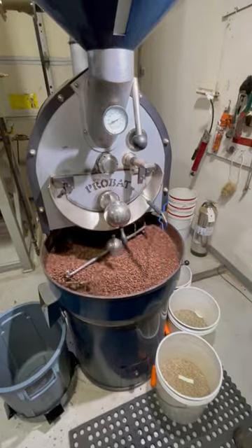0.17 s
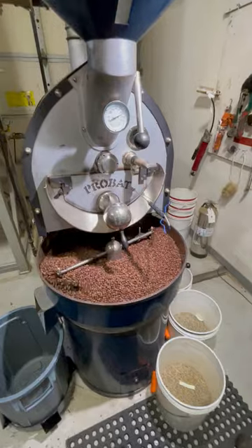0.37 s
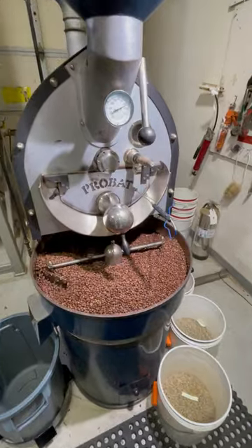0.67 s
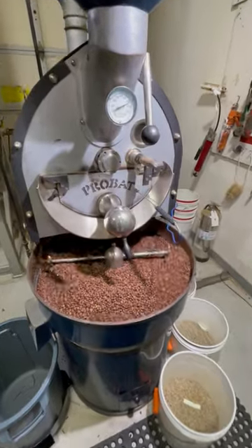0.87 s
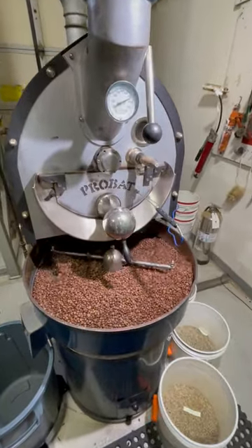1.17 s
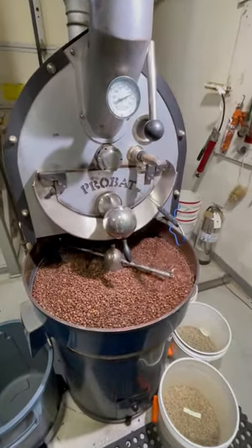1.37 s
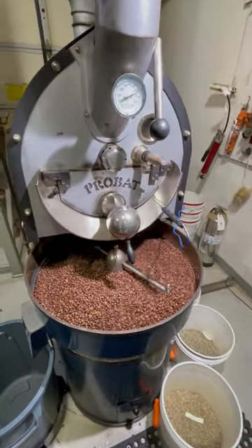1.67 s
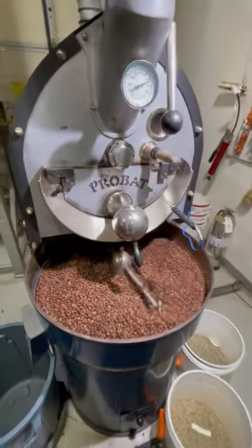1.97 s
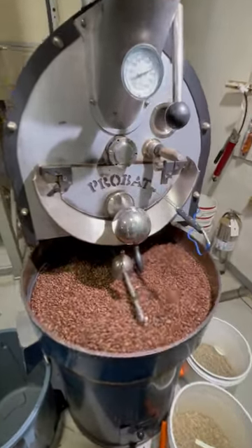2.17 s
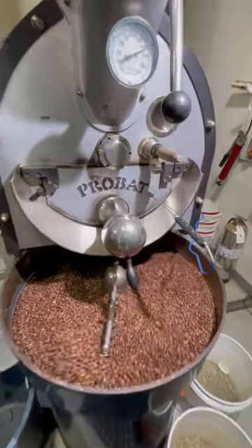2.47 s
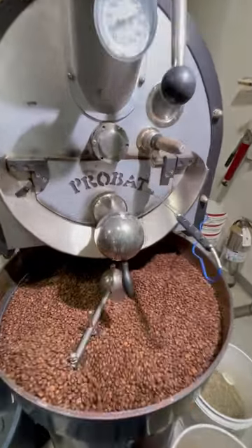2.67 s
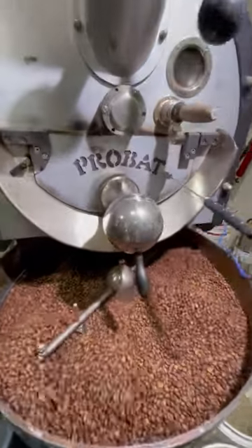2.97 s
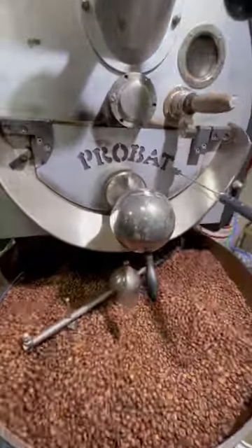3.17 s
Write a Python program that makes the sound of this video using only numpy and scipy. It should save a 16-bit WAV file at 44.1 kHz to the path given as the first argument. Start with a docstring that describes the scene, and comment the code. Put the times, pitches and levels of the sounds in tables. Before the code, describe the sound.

A drum coffee roaster roars steadily in a workshop, with a low, wavering drone and a faint motor whine. Stirred beans rustle and tick in the cooling tray, growing slightly brighter as the microphone moves closer.

```python
"""A drum coffee roaster roars in a workshop, heard from in front of its cooling tray.
Burner and cooling air rush through booming ducts; the motors hum and whine faintly.
Stirring arms push roasted beans round the tray: a fine, dense rustle whose treble swells
as the listener leans in. Now and then beans drop off an arm, and one clinks on the steel."""
import sys
import numpy as np
from scipy import signal
from scipy.fft import rfft, irfft, next_fast_len
from scipy.io import wavfile
from scipy.ndimage import uniform_filter1d

SR = 44100
rng = np.random.default_rng(int(sys.argv[2]) if len(sys.argv) > 2 else 0)


def master_out(mix):
    """Clip the mix to full scale and print it as 16-bit PCM to the path in sys.argv[1]."""
    frames = np.transpose(np.atleast_2d(mix))
    ceiling = np.clip(frames, -1, 1)
    pcm = np.round(ceiling * 32767).astype(np.int16)
    wavfile.write(sys.argv[1], SR, pcm)


N = 146412
TIME = np.arange(N) / SR
SIDES = np.array([[1], [-1]])  # plus for left, minus for right


def from_db(db):
    """Turn decibels into a number to multiply by."""
    return 10 ** (np.asarray(db) / 20)


def unit_power(x):
    """Scale a signal so that its average power is 1."""
    return x / np.sqrt(np.mean(x ** 2) + 1e-20)


def at_hz(points, hz):
    """Read between a table's rows, giving every octave equal room."""
    row_hz, value = np.transpose(points)
    return np.interp(np.log(np.maximum(hz, 1)), np.log(row_hz), value)


def swell(points):
    """Make a smooth volume curve from rows of seconds and dB."""
    return from_db(np.interp(TIME, *np.transpose(points)))


def drift(rate_hz):
    """A smooth random wobble, about 1 in size; a higher rate wobbles faster."""
    step, warm_up = 40, 2000
    pole = np.exp(-2 * np.pi * rate_hz * step / SR)
    noise = rng.standard_normal(N // step + warm_up + 2)
    slow = signal.lfilter([1], [1, -2 * pole, pole * pole], noise)[warm_up:]
    return np.interp(np.arange(N) / step, np.arange(len(slow)), unit_power(slow))


def ring(clicks, hz, fade_s):
    """Each click starts a pure tone that dies away by 60 dB in fade_s seconds."""
    decay, angle = np.exp(-np.log(1000) / (fade_s * SR)), 2 * np.pi * hz / SR
    return signal.lfilter([0, np.sin(angle)], [1, -2 * decay * np.cos(angle), decay ** 2], clicks + 1e-18)


# How alike the two sides sound. Each row: pitch in Hz, likeness from -1 (opposite) to 1 (same).
SIDE_LIKENESS = [(100, .9995), (200, 1), (380, 0.97), (700, 0.75), (1300, 0.54), (1900, 0.35),
                 (2400, -0.073), (3200, -0.32), (4300, 0.33), (5500, 0.048), (6600, 0.41), (8000, 1),
                 (15000, 0.69)]
# Which side is louder. Each row: pitch in Hz, left minus right in dB.
SIDE_BALANCE = [(380, 0), (700, 1.7), (1300, 2), (2400, 1.5), (4400, 1.5), (9000, 0)]
def place(mid, side, hz):
    """Mix two unrelated signals into left and right, as alike as the room leaves them."""
    alike = np.clip(at_hz(SIDE_LIKENESS, hz), -.9995, .9995)
    stereo = np.sqrt((1 + alike) / 2) * mid + np.sqrt((1 - alike) / 2) * side * SIDES
    return stereo * from_db(SIDES * at_hz(SIDE_BALANCE, hz) / 2)


def reflections(hz, count=10, longest_s=.03, echo_db=-12):
    """Short echoes off walls and steel make some pitches louder and others softer."""
    delays = rng.uniform(.1, 1, count) * longest_s
    echoes = sum(np.exp(-2j * np.pi * hz * delay) for delay in delays) / np.sqrt(count)
    reach = np.minimum(hz / 600, 1) ** 2  # the effect fades below 600 Hz
    return unit_power(np.abs(1 + from_db(echo_db) * echoes * reach))


# How far the left side's noise runs ahead. Each row: pitch in Hz, lead in radians.
LEFT_LEAD = [(20, 0), (120, 0), (430, 0.15), (900, 0.92), (1800, 0.01), (2600, 0.77), (4000, 0.65),
             (5500, 0.7), (8000, 0)]
def noise_bands(spectrum, count=14):
    """Shape stereo noise and split it into overlapping bands, each paired with its centre in Hz."""
    size = next_fast_len(N, True)
    hz = np.arange(size // 2 + 1) * SR / size
    colour = unit_power(from_db(at_hz(spectrum, hz)) * reflections(hz))
    lead = np.exp(.5j * at_hz(LEFT_LEAD, hz) * SIDES)
    white = rfft(rng.standard_normal((2, size)))
    noise = place(*white, hz) * colour * lead
    centres = np.geomspace(60, 14000, count)
    for centre in centres:
        share = at_hz(np.c_[centres, centres == centre], hz)
        yield centre, irfft(noise * share, size)[:, :N]


# The tone colour of burner and air. Each row: pitch in Hz, relative strength in dB.
ROAR_COLOUR = [(20, -26), (31, -14), (45, -9.5), (85, -0.5), (105, -1.5), (135, 0), (190, 0), (280, -5),
               (350, -3), (410, -6.5), (460, -12), (720, -14), (1050, -18), (1700, -23.5), (2500, -24),
               (3600, -29), (8000, -37), (16000, -113)]
def air_roar(level_db=-21, flutter_db=.8):
    """Swirling air roars; every band flutters, partly in step with the rest."""
    shared_db = .35 * drift(13)
    return sum(band * from_db(level_db + shared_db + flutter_db * drift(6.8))
               for _, band in noise_bands(ROAR_COLOUR))


def resonances(table, steady_s=.2):
    """Swirling air keeps hollow spaces throbbing, at a strength that is steady in the long run."""
    out = 0
    for hz, width_hz, db in table:
        b, a = signal.iirpeak(hz, hz / width_hz, fs=SR)
        air = rng.standard_normal(N + SR)
        throb = signal.lfilter(b, a, signal.lfilter(b, a, air))[SR:]  # skip the build-up
        strength = np.sqrt(uniform_filter1d(throb ** 2, int(steady_s * SR)) + 1e-18)
        out = out + from_db(db) * unit_power(throb / strength)
    return out


# The path of the booming note. Each row: time in seconds, pitch in Hz, level in dB.
BOOM_PATH = [(0.05, 116, -26), (0.09, 118.5, -22), (0.26, 118.6, -43), (0.31, 113.4, -20),
             (0.42, 113, -20.5), (0.5, 112.3, -20), (0.565, 109.6, -41), (0.615, 110.5, -13),
             (0.68, 112, -27.5), (0.79, 111.6, -23.5), (0.85, 114.3, -20), (0.93, 109.8, -21.5),
             (0.97, 110.8, -17.5), (1.05, 111.8, -19), (1.14, 112.3, -40), (1.29, 116.2, -21),
             (1.355, 110, -31), (1.4, 107.3, -20), (1.53, 107, -16), (1.63, 107.4, -24.5),
             (1.69, 110.1, -19.5), (1.74, 109.1, -25), (1.88, 110, -16.5), (2.01, 116, -34.5),
             (2.11, 122.6, -20), (2.28, 112.7, -27), (2.37, 117.6, -22.5), (2.46, 122, -28),
             (2.54, 128.8, -19.5), (2.64, 124, -49), (2.705, 120.5, -14.5), (2.745, 111.6, -35),
             (2.785, 112, -9), (2.83, 111, -47), (2.88, 114, -20.5), (3.079, 113.6, -22),
             (3.16, 108, -22.5), (3.23, 107.8, -20), (3.32, 107, -17)]
def duct_boom(wander_hz=3.5, flutter_db=1.5):
    """The strongest resonance of the ducts throbs as one wavering low note."""
    times, hz, db = np.transpose(BOOM_PATH)
    pitch = np.interp(TIME, times, hz) + wander_hz * drift(20)
    note = np.sin(2 * np.pi * (np.cumsum(pitch) / SR + rng.random()))
    flutter = from_db(flutter_db * drift(20))
    return unit_power(note * flutter) * swell(np.c_[times, db])


# Duct and drum notes, a deep rumble and a higher drone. Each row: pitch in Hz, width in Hz, level in dB.
DUCT_NOTES = [(53.5, 5.5, -32.5), (135.2, 13.4, -30.5), (212.4, 1.9, -34), (256.4, 9.6, -34.5),
              (306.4, 30, -36.5)]
RUMBLE_NOTE = [(73.5, 2.5, -25.5)]
DRONE_NOTE = [(176.3, 3.94, -31)]
# How the rumble and the drone swell and sink. Each row: time in seconds, added level in dB.
RUMBLE_SWELL = [(.1, 2.5), (.42, -6), (.52, 4), (.8, 0), (.95, -4), (1.3, 3), (1.5, -4), (2.55, -5),
                (2.85, 2), (3.02, -10), (3.25, 1.5)]
DRONE_SWELL = [(.05, -2), (.26, 10.5), (.55, -6), (.8, 1.5), (1.5, -14), (2.0, -2.5), (3.3, 0.5)]
def ducts(right_delay_s=4.5e-5):
    """Airflow sets the ducts droning; the sound reaches the left side a moment earlier."""
    left = resonances(DUCT_NOTES) + duct_boom()
    left += resonances(RUMBLE_NOTE) * swell(RUMBLE_SWELL)
    left += resonances(DRONE_NOTE) * swell(DRONE_SWELL)
    right = np.interp(TIME - right_delay_s, TIME, left)
    return np.array([left, right])


# The housing's hollow notes. Each row: pitch in Hz, width in Hz, level in dB.
HOUSING_NOTES = [(770, 70, -40.5), (828, 40, -43)]
# How they come and go. Each row: time in seconds, added level in dB.
HOUSING_SWELL = [(.09, 8), (.25, -4), (.5, 3), (1.3, -9), (2.4, -6), (2.85, 3), (3.2, -8)]
def hollow_housing():
    """The airflow draws a hollow, breathy ring from the housing."""
    mid, side = resonances(HOUSING_NOTES), resonances(HOUSING_NOTES)
    return place(mid, side, hz=HOUSING_NOTES[0][0]) * swell(HOUSING_SWELL)


def tones(table, wander_hz=2, waver_db=2):
    """Steady machine tones waver in the room's echoes."""
    out = 0
    for hz, db in table:
        pitch = hz + wander_hz * drift(3.1)
        phase = 2 * np.pi * (np.cumsum(pitch) / SR + rng.random())
        mid = unit_power(np.sin(phase) * from_db(waver_db * drift(1.5)))
        side = unit_power(np.cos(phase) * from_db(waver_db * drift(1.5)))
        out = out + from_db(db) * place(mid, side * rng.choice([-1, 1]), hz)
    return out


# The hum, the high whine and the strongest whine. Each row: pitch in Hz, level in dB.
HUM_TONES = [(221, -36), (359, -37.5), (541, -44.5), (600, -48.5), (659, -48), (719, -49.5), (834, -49),
             (942, -49), (1159, -53), (1254, -50.5), (1356, -53.5), (1668, -55.5), (2284, -56.5),
             (2850, -57.5)]
WHINE_TONES = [(4864, -61), (5226, -57), (5314, -56.5), (5652, -57.5), (5840, -59), (6164, -56),
               (6686, -59), (7009, -60.5)]
MAIN_WHINE_TONE = [(6056, -54.5)]
# How the strongest whine swells. Each row: time in seconds, added level in dB.
MAIN_WHINE_SWELL = [(0, -2), (.7, 8), (1.2, -1), (3.3, 4)]
def motors():
    """The motors and fan hum while the drive whines high above them."""
    return tones(HUM_TONES) + tones(WHINE_TONES) + tones(MAIN_WHINE_TONE) * swell(MAIN_WHINE_SWELL)


# How the rustle changes. Each row: time in seconds, dB added to its body, dB added to its treble.
RUSTLE_SWELL = [(0, 0, 2), (.7, -1, 3), (1.1, -2, 2.5), (1.5, -.5, 2.5), (1.9, -2, 1), (2.3, -2.5, 3),
                (2.7, -4.5, 3.5), (3.0, -2.5, 5), (3.3, -3, 6)]
def rustle_db(hz, body_hz=5500, treble_hz=9200):
    """The level added to the stirred beans' rustle over time, at one pitch."""
    times, body, treble = np.transpose(RUSTLE_SWELL)
    treble_share = at_hz([(body_hz, 0), (treble_hz, 1)], hz)
    return np.interp(TIME, times, body + treble_share * (treble - body))


# The tone colour of sliding beans. Each row: pitch in Hz, relative strength in dB.
BEAN_COLOUR = [(1200, 2.5), (2500, -9), (4000, 0.5), (5800, 8), (7500, -1.5), (9500, -1), (12000, -10.5),
               (15500, -8)]
def sliding_beans(level_db=-38, flutter_db=.7):
    """Countless beans rubbing together merge into a hiss."""
    return sum(band * from_db(level_db + rustle_db(hz) + flutter_db * drift(58))
               for hz, band in noise_bands(BEAN_COLOUR))


# The tray's high notes. Each row: pitch in Hz, width in Hz, then a level in dB for each of times_s.
TRAY_NOTES = [(5250, 220, -51, -52, -46.5), (5740, 110, -77, -55, -48), (6070, 140, -45, -68, -54),
              (6950, 190, -51, -53, -52), (8500, 300, -67, -71, -58)]
def ringing_tray(times_s=(.4, 1.5, 2.7)):
    """Sliding beans keep the tray ringing; the mix of notes shifts as the listener moves."""
    out = 0
    for hz, width_hz, *levels_db in TRAY_NOTES:
        b, a = signal.iirpeak(hz, hz / width_hz, fs=SR)
        ringing = signal.lfilter(b, a, rng.standard_normal((2, N)))
        out = out + unit_power(place(*ringing, hz)) * swell(np.c_[times_s, levels_db])
    return out


def tumbling_beans(level_db=-43.5, base_ticks_per_s=2600, pitch_count=14):
    """Single beans knock together in little clumps, each a tiny tick somewhere in the tray."""
    sizes = from_db(2.2 * np.minimum(rng.exponential(1, N), 5))  # many small, a few big
    sizes *= rng.choice([-1, 1], N)
    # The chance of a tick wobbles quickly, which bunches the ticks into clumps.
    clicks = sizes * (rng.random(N) < base_ticks_per_s / SR * from_db(4.5 * drift(50)))
    pan = from_db(rng.normal(0, .46, N) * SIDES)
    pitch_choice = rng.integers(0, pitch_count, N)
    ticks = 0
    for k, hz in enumerate(np.geomspace(4000, 13000, pitch_count)):
        ringing = ring(clicks * pan * (pitch_choice == k), hz, fade_s=7 / hz)  # seven vibrations long
        ticks = ticks + ringing * from_db(rustle_db(hz)) * np.sqrt(hz)
    return from_db(level_db) * unit_power(ticks)


# Beans falling off an arm. Each row: start in seconds, rough peak level in dB.
BEAN_DROPS = [(.618, -28), (1.249, -26), (1.753, -28.5), (1.812, -28.5), (2.415, -29.5), (2.555, -29.5),
              (3.04, -27), (3.134, -25)]
def dropping_beans(band_hz=(6000, 10000), fade_s=.035):
    """Now and then a few beans drop off an arm with a crisp tick."""
    band = signal.butter(2, band_hz, "band", fs=SR, output="sos")
    crisp = unit_power(signal.sosfilt(band, rng.standard_normal(N)))
    volume = 0
    for start, peak_db in BEAN_DROPS:
        db = peak_db - 6 - 60 * np.abs(TIME - start) / fade_s  # noise peaks about 6 dB over its average
        volume = volume + (TIME >= start) * from_db(db)
    return crisp * volume


# A bean hitting the tray. Each row: start in seconds, level in dB.
BEAN_HITS = [(.806, -29.5)]
# The notes of the tray's steel. Each row: pitch in Hz, added level in dB.
STEEL_NOTES = [(2330, -5), (3080, -5), (3420, 1.5), (3600, 0)]
def clinking_bean():
    """A bean strikes the tray and the steel rings briefly."""
    knocks = sum(from_db(db) * (np.arange(N) == int(start * SR)) for start, db in BEAN_HITS)
    return sum(from_db(db) * ring(knocks, hz, fade_s=.05) for hz, db in STEEL_NOTES)


# An arm shoving a heap of beans.
# Each row: loudest moment in seconds, rise and fall time in seconds, centre pitch in Hz, level in dB.
ARM_SHOVES = [(.82, 0.045, 2200, -45), (1.25, 0.021, 8970, -54), (1.387, 0.053, 2000, -46),
              (1.774, 0.041, 1077, -41), (2.059, 0.08, 1893, -44), (2.1, 0.33, 1190, -46),
              (3.166, 0.16, 8370, -54)]
def shoved_beans(width_octaves=.97):
    """Small avalanches in front of the arms swish up and die away."""
    out = 0
    for peak_s, rise_s, hz, db in ARM_SHOVES:
        edges_hz = hz * 2 ** (width_octaves * np.array([-.5, .5]))
        band = signal.butter(2, edges_hz, "band", fs=SR, output="sos")
        swish = signal.sosfilt(band, rng.standard_normal((2, N)))
        volume = from_db(db) * np.exp(-((TIME - peak_s) / rise_s) ** 2)
        out = out + unit_power(place(*swish, hz)) * volume
    return out


def scene():
    """The running machine and the beans in its tray, heard together."""
    machine = air_roar() + ducts() + hollow_housing() + motors()
    rustle = sliding_beans() + ringing_tray() + tumbling_beans()
    return machine + rustle + dropping_beans() + shoved_beans() + clinking_bean()


def record(dry, start_s=.035, cutoff_hz=15900):
    """The sound starts after a moment of silence, and the highest treble is cut away."""
    fade_in = np.clip((TIME - start_s) / .002, 0, 1)
    low_pass = signal.firwin(401, cutoff_hz, fs=SR)
    return signal.fftconvolve(dry * fade_in, low_pass[None], mode="same", axes=1)


dry = scene()
out = record(dry)
master_out(out)
```